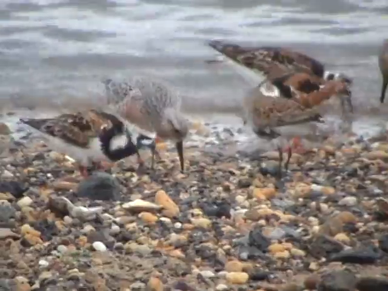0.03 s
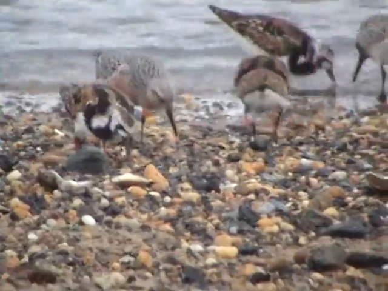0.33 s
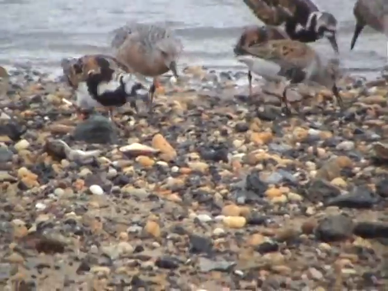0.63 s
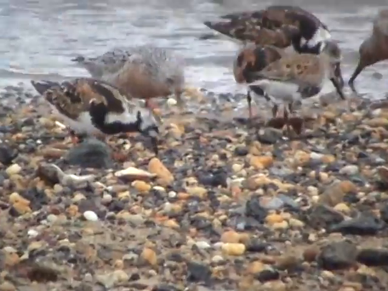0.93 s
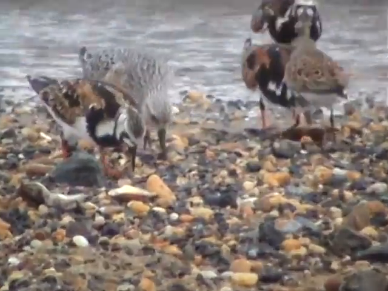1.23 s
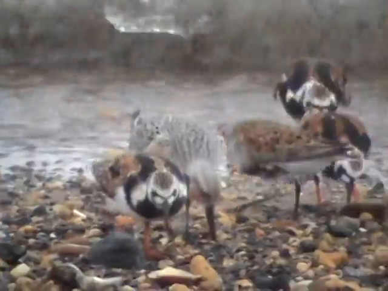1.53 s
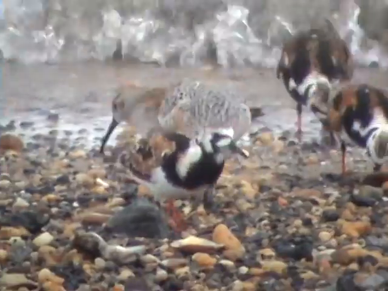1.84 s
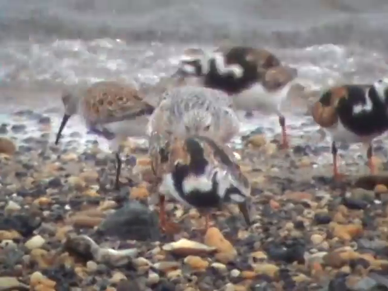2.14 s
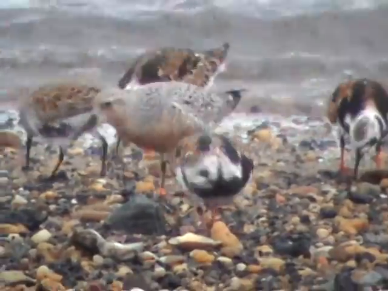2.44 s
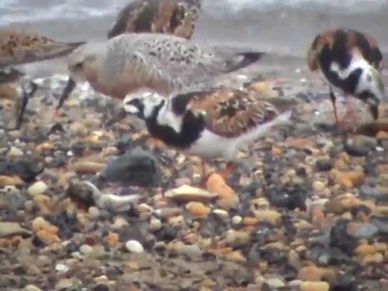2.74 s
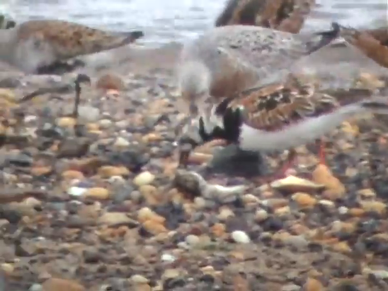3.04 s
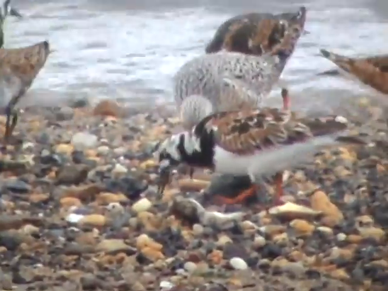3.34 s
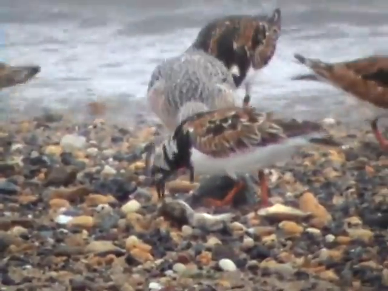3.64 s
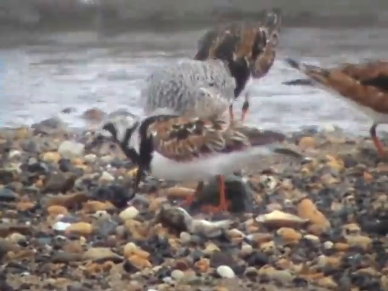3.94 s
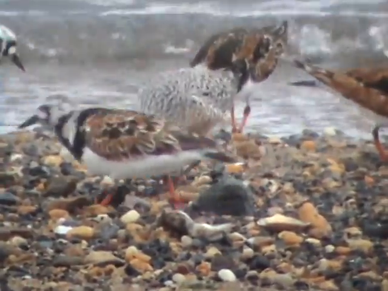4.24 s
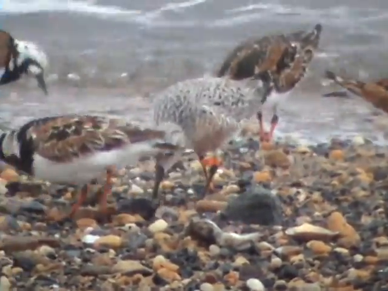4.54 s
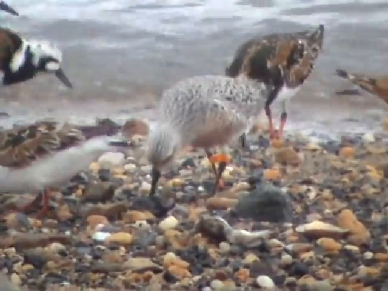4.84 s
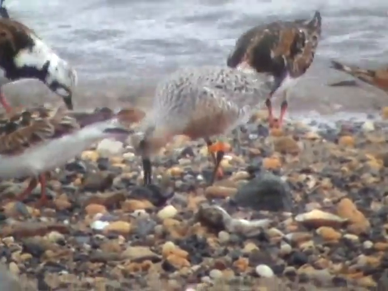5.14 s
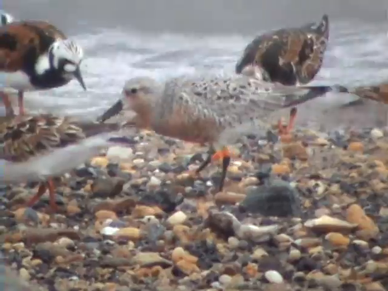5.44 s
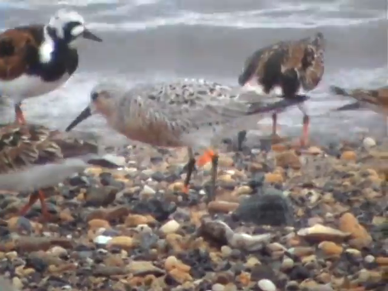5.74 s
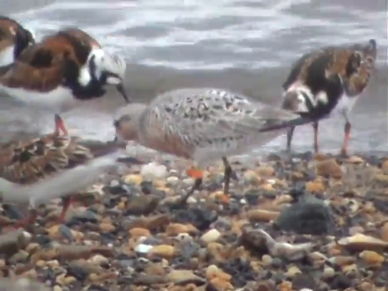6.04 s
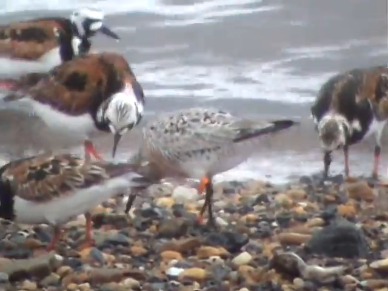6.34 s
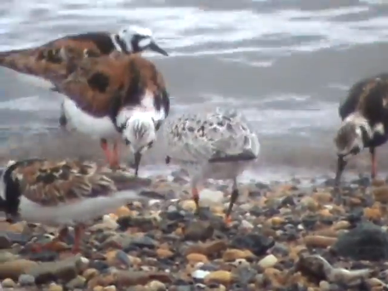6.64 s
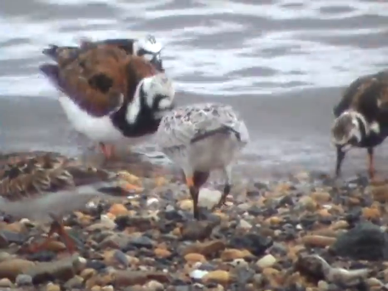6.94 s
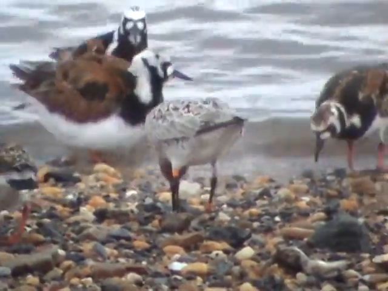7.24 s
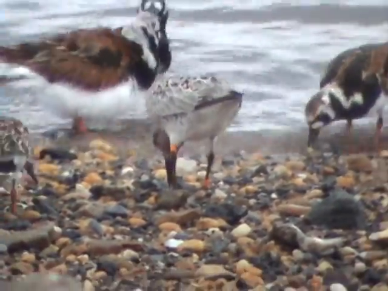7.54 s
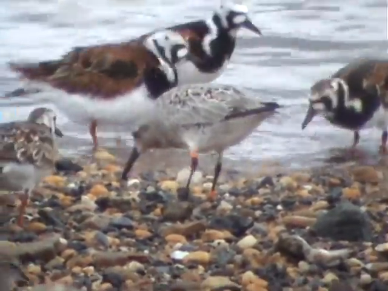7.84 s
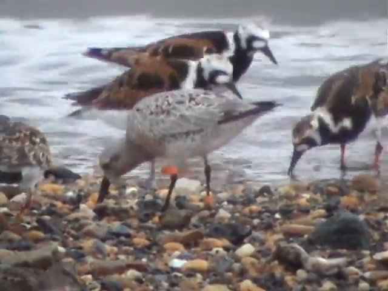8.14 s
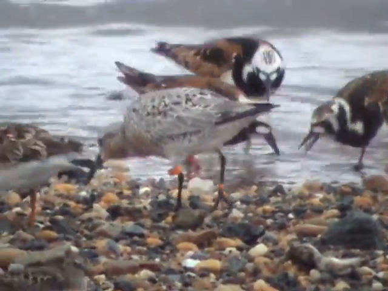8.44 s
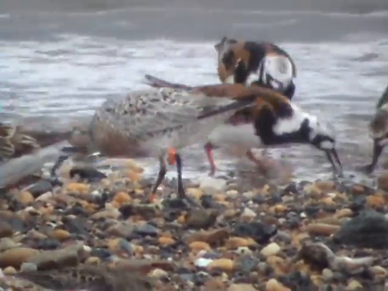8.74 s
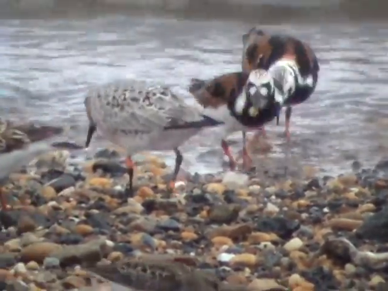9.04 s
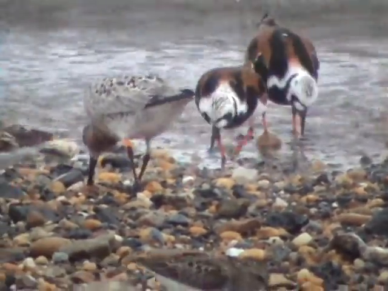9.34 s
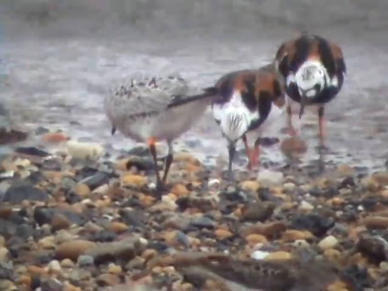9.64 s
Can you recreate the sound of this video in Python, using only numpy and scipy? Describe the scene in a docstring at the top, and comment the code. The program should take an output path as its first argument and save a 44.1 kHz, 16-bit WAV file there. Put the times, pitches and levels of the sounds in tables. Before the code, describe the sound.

A flock of shorebirds squabbles a few metres from the microphone on a pebble beach, with more birds chattering further off. Their rapid rattles and short whistles are broken by three louder falling cries in the first half. Small waves wash and bubble throughout, and one breaks early with a plop and fizz. Later the calls turn to short yaps. A few pebbles tick, and a very faint hum lies behind.

```python
"""Shorebirds on a pebble beach.

A flock squabbles a few metres away; more birds chatter further off. Notes are falling tones, chopped
into rattles that come in fading bursts or drawn out as whistles and cries; later come pips, arched
yaps and a squeak. Small waves wash in with ringing bubbles, and one breaks with a plop of trapped
air. Bills and feet tick on pebbles. Behind it all: a faint low hum, a distant engine-like drone and
a thin high whine."""
import sys
import numpy as np
from scipy import signal
from scipy.fft import rfft, irfft, next_fast_len
from scipy.io import wavfile
from scipy.ndimage import uniform_filter1d

SR = 44100
rng = np.random.default_rng(int(sys.argv[2]) if len(sys.argv) > 2 else 0)


def unload_wav(signal):
    """Save mono or channel-first audio to the path in sys.argv[1] as 16-bit WAV at rate SR, clipped to [-1, 1]."""
    wavfile.write(
        sys.argv[1],
        SR,
        np.round(np.clip(np.atleast_2d(signal).T, -1, 1) * 32767).astype(np.int16),
    )


N = 427769
TIME_S = np.arange(N) / SR

# waves (time [s], wash [relative dB], spray [relative dB])
WAVE_LEVELS = [(0.04, -57, -57), (0.33, -52, -57), (0.77, -55, -59), (1.98, -44.5, -55), (2.27, -55, -58),
               (3.19, -58, -62), (3.65, -53, -61), (4.37, -55.5, -62), (5.02, -50.5, -59), (6.09, -55, -60),
               (7.11, -54, -60), (7.4, -59, -62), (8.3, -59, -63), (9.7, -52.5, -58)]
# water noise (frequency [Hz], density [relative dB])
SURF_SPECTRUM = [(18, -50), (30, -9.5), (122, -7), (355, -10.5), (460, -16.5), (581, -8), (859, -10),
                 (1200, -5.5), (2190, -4.5), (2630, -5.5), (12500, -31), (15000, -48)]
# likeness of the surf at the two microphone ports (frequency [Hz], coherence [0-1])
PORT_COHERENCE = [(60, 1), (250, 0.6), (500, 0.07), (1000, 0.75), (2500, 1), (8000, 0.53), (12000, 0)]
# deep rumble (time [s], swell [relative])
RUMBLE_SWELL = [(5.1, -17), (5.45, 20), (5.85, 23), (6.2, 0)]
# low hum, distant engine-like drone (frequency [Hz], start level [dB], end level [dB])
HUM_AND_DRONE = [(113.6, -67, -76), (370, -75, -69)]
# throat and bill response (frequency [Hz], gain [dB])
THROAT_GAIN = [(700, 8.5), (1200, -1), (1800, 3), (3000, 4), (3800, 5.5), (4700, 3), (5400, -5),
               (7500, -10), (10000, -11), (12500, -6), (15000, -16)]
# distant flock (time [s], gain [dB])
FLOCK_GAIN = [(1.5, -1), (2.7, 2), (4.4, -2), (5.6, 4), (7.5, -2)]
# whistles (time [s], length [s], top pitch [Hz], level [dB], voice)
WHISTLE_NOTES = [(0.035, 0.04, 1520, -35, "full"), (0.088, 0.069, 1700, -36, "full"),
                 (0.7, 0.066, 1607, -34, "full"), (0.744, 0.027, 2106, -40.5, "pure"),
                 (2.419, 0.07, 1497, -38, "thin"), (2.725, 0.045, 1320, -43, "hoarse"),
                 (3.683, .035, 1380, -38, "thin"), (3.724, .03, 1350, -39, "thin"),
                 (3.775, .04, 1420, -38, "thin"), (4.826, 0.055, 1256, -36, "thin"),
                 (5.154, 0.037, 1352, -35, "thin"), (5.232, 0.052, 1587, -38.5, "reedy"),
                 (5.366, 0.025, 1317, -36, "thin"), (5.8, 0.022, 1163, -37, "thin"),
                 (5.886, 0.066, 1605, -43, "reedy"), (6.53, 0.057, 1292, -38, "thin"),
                 (6.717, 0.048, 1573, -40.5, "hoarse"), (6.828, 0.066, 1685, -41, "hoarse"),
                 (6.955, 0.048, 1730, -40, "hoarse"), (7.171, 0.045, 1433, -33, "thin"),
                 (7.689, 0.056, 570, -41, "pure"), (7.872, 0.072, 1350, -45, "pure"),
                 (7.965, .1, 1320, -47, "pure"), (8.293, 0.042, 620, -45, "pure"),
                 (8.792, 0.024, 1740, -41, "thin"), (9.129, .048, 1120, -41.5, "pure")]
# voice: (fundamental [dB], third harmonic [dB], flutter [0-1], pan [dB], crest [share of length],
# pitch fall per note length [1/s]); harmonics re the second, pan is left minus right
WHISTLE_VOICES = {"full": (4.5, -16, 0.55, -2, .27, 5), "reedy": (-3, -4, 0.3, -9, .4, 3),
                  "thin": (-10, -19, 0.9, 1, .15, 4), "hoarse": (-1, -11, 1, 2, .28, 4.8),
                  "pure": (-22, -22, 0.1, 1, .2, 1.3)}
# rattle bursts (time [s], notes, lead length [s], lead pitch [Hz], lead level [dB])
RATTLE_BURSTS = [(0.065, 1, 0.061, 1408, -38), (0.129, 1, 0.016, 1414, -37.5),
                 (0.161, 1, 0.028, 1530, -38.5), (0.214, 1, 0.036, 1600, -35.5),
                 (0.268, 1, 0.041, 1673, -39.5), (0.315, 1, 0.016, 1475, -36), (0.359, 3, 0.023, 1507, -38),
                 (0.747, 1, 0.024, 1444, -38.5), (0.964, 1, 0.025, 1443, -38), (1.237, 1, 0.035, 1934, -38),
                 (2.595, 1, 0.034, 1520, -40.5), (2.655, 1, 0.043, 1710, -38), (2.814, 1, 0.025, 1500, -44),
                 (2.846, 1, 0.019, 1525, -40), (2.873, 1, 0.021, 1640, -36.5), (2.898, 1, 0.029, 1680, -34),
                 (3.433, 1, 0.024, 1950, -36.5), (3.69, 2, 0.032, 1520, -38),
                 (3.792, 2, 0.039, 1610, -35.5), (3.907, 1, 0.021, 1350, -40),
                 (3.951, 1, 0.046, 1656, -35.5), (4.06, 2, 0.035, 1660, -35),
                 (4.178, 1, 0.025, 1545, -39.5), (4.224, 1, 0.034, 1720, -34),
                 (4.29, 1, 0.012, 1380, -41.5), (4.349, 3, 0.021, 1650, -34.5),
                 (4.514, 1, 0.045, 1727, -35), (4.674, 1, 0.052, 1610, -37.5), (4.942, 3, 0.035, 1482, -38),
                 (5.214, 1, 0.043, 1774, -37.5), (5.352, 2, 0.024, 1553, -36), (5.47, 1, 0.045, 1730, -37),
                 (5.556, 2, 0.023, 1535, -38), (5.632, 1, 0.036, 1530, -39.5),
                 (5.691, 1, .032, 1450, -37.5), (5.745, 2, 0.024, 1497, -38.5),
                 (6.013, 1, 0.022, 1740, -36), (6.064, 1, 0.029, 1633, -36.5),
                 (6.18, 2, 0.028, 1656, -36.5), (6.297, 2, 0.037, 1603, -36.5),
                 (7.006, 1, 0.021, 1373, -39.5), (7.139, 2, 0.035, 1504, -37.5),
                 (7.279, 1, 0.027, 1218, -39.5), (8.651, 1, 0.026, 1640, -42.5)]
# upper harmonics of the rattles (time [s], brightness [dB])
RATTLE_BRIGHTNESS = [(0, -5), (2.9, -4), (3.5, -10), (5.5, -6), (6.1, -4)]
# where the rattling and yapping birds stand (time [s], pan [dB])
BIRD_PAN = [(0, -1.5), (2.8, -6.5), (4, -2.5), (6.3, -4.5), (7.1, -0.5), (8.4, 4)]
# three cries, one curve each (time [s], pitch [Hz], level [relative dB])
CRY_CURVES = [
    [(0.505, 1570, -37), (0.517, 1790, -28), (0.529, 1823, -30), (0.549, 1663, -28.5), (0.565, 1425, -33),
     (0.587, 1106, -39), (0.6, 1000, -44)],
    [(2.3, 1910, -31), (2.312, 1883, -22), (2.32, 1887, -24), (2.352, 1844, -26.5), (2.38, 1653, -25),
     (2.402, 1490, -33.5), (2.425, 1125, -33.5)],
    [(3.452, 2060, -27.5), (3.472, 1748, -24), (3.502, 1566, -25), (3.51, 1510, -28), (3.518, 1446, -29),
     (3.548, 1176, -37.5), (3.56, 1130, -28.5)],
]
# knocked pebbles (time [s], ring [Hz], level [relative dB])
PEBBLE_TICKS = [(1.106, 8400, -37), (3.005, 6660, -33), (3.786, 9450, -33), (6.018, 9000, -40),
                (7.727, 7500, -33)]
# air pockets under the breaker (time [s], ring [Hz], t60 [s], level [dB])
AIR_PLOPS = [(1.633, 1200, .02, -26), (1.73, 1220, .023, -21), (1.7368, 4400, .0027, -20),
             (1.737, 1500, .015, -16.5), (1.7374, 1175, .026, -11.5), (1.738, 396, .062, -33)]
# collapse of the wave (start [s], end [s])
BREAKER_SPAN_S = (1.72, 2)
# pips, and one sharp pulse of a rattle at 4.667 s (time [s], length [s], top pitch [Hz], level [dB])
SHARP_PULSES = [(3.442, 0.017, 1500, -34), (4.667, 0.0062, 1720, -30), (5.58, 0.015, 1610, -31.5),
                (5.86, 0.019, 1610, -29.5), (6.163, 0.014, 1640, -29), (7.087, 0.02, 1610, -33)]
# yaps (time [s], length [s], top pitch [Hz], level [dB], tone)
YAP_NOTES = [(6.455, .042, 1188, -40.5, "harsh"), (7.781, 0.03, 1222, -43.5, "clear"),
             (7.832, 0.026, 1350, -42, "clear"), (7.922, .036, 1328, -38.5, "harsh"),
             (8.033, 0.042, 1354, -41.5, "clear"), (8.268, 0.036, 1404, -42, "clear"),
             (8.374, 0.029, 1310, -42, "harsh"), (8.489, 0.041, 1720, -43, "harsh"),
             (8.529, 0.048, 1570, -40.5, "harsh"), (8.696, 0.029, 1360, -40, "harsh"),
             (8.743, 0.033, 1390, -42, "harsh"), (8.813, .034, 1333, -42.5, "harsh"),
             (8.874, 0.039, 1343, -42, "harsh"), (8.939, 0.037, 1355, -41.5, "harsh"),
             (9.003, 0.053, 1616, -36.5, "harsh"), (9.097, 0.029, 1315, -41, "harsh"),
             (9.262, 0.068, 1380, -37.5, "clear"), (9.385, 0.026, 1480, -45, "clear"),
             (9.437, 0.029, 1285, -38, "clear"), (9.513, 0.028, 1237, -41, "harsh"),
             (9.646, 0.025, 1534, -44, "harsh")]
# tone: (roughness [0-1])
YAP_TONES = {"clear": .3, "harsh": .9}
# squeak (time [s], pitch [Hz])
SQUEAK_CURVE = [(7.345, 3300), (7.375, 5800), (7.387, 5000), (7.399, 5500), (7.414, 3300)]
# microphone ports (frequency [Hz], left lead [rad])
PORT_LEAD = [(60, -0.23), (350, 0.65), (2700, -0.98), (12000, -0.5)]


def undb(db):
    return 10 ** (np.asarray(db) / 20)


def unit(x):
    return x / np.sqrt(np.mean(x ** 2) + 1e-18)


def at_s(points, s):
    return np.interp(s, *np.transpose(points))


def at_hz(points, hz):
    """Interpolate on a log-frequency axis."""
    f, value = np.transpose(points)
    return np.interp(np.log(np.maximum(hz, 1)), np.log(f), value)


def butter(x, order, hz, kind):
    return signal.sosfilt(signal.butter(order, hz, kind, fs=SR, output="sos"), x)


def walk(rate_hz, size=N):
    """Smooth random wander, spread near 1."""
    k = max(int(SR / rate_hz), 1)
    held = np.repeat(rng.standard_normal(size // k + 2), k)
    return 1.39 * uniform_filter1d(uniform_filter1d(held, k), k)[:size]


def add(out, s, sound, pan_db=0):
    """Mix in at time s; pan is left minus right."""
    i = max(int(s * SR), 0)
    part = sound[:max(N - i, 0)]
    out[:, i:i + len(part)] += undb(np.array([[pan_db], [-pan_db]]) / 2) * part


def ring(hz, t60_s, glide=0):
    """Damped resonance; glide raises the pitch as it fades."""
    t = np.arange(int(t60_s * SR) + 2) / SR
    return np.sin(2 * np.pi * hz * t * (1 + glide * t / t60_s / 2)) * np.exp(-np.log(1000) * t / t60_s)


def progress(length_s):
    """0 to 1 through a note."""
    return np.linspace(0, 1, int(max(length_s, .004) * SR))


def wave_swell_db():
    """Wash and spray over their median levels."""
    s, *columns = np.transpose(WAVE_LEVELS)
    return [np.interp(TIME_S, s, db - np.median(db)) for db in columns]


def surf(level_db=-44, flicker_db=4.5, splash_db=4.5):
    """Water noise in half octaves: near-steady rumble, spluttering wash, smoothly swelling spray."""
    wash_db, spray_db = wave_swell_db()
    size = next_fast_len(N)
    hz = np.maximum(np.arange(size // 2 + 1) * SR / size, 1)
    mid, side = rfft(rng.standard_normal((2, size)))
    coherence = np.clip(at_hz(PORT_COHERENCE, hz), 0, 1)
    spectrum = np.sqrt(1 + coherence) * mid + np.sqrt(1 - coherence) * side * np.array([[1], [-1]])
    spectrum *= undb(at_hz(SURF_SPECTRUM, hz))
    spectrum *= undb(level_db) / irfft(spectrum).std()
    out, splash = 0, walk(45)
    for octave in np.arange(4, 14.5, .5):
        band = irfft(spectrum * np.maximum(1 - 2 * abs(np.log2(hz) - octave), 0), size)[:, :N]
        wash_share = at_hz([(130, .099), (300, .075), (900, .8), (4000, .1)], 2 ** octave)
        spray_share = at_hz([(1000, 0), (5000, .9), (15000, .4)], 2 ** octave)
        splutter_db = flicker_db * walk(25) + splash_db * splash
        rumble_db = at_hz([(130, .059), (220, 0)], 2 ** octave) * at_s(RUMBLE_SWELL, TIME_S)
        out += band * undb(rumble_db + wash_share * (wash_db + splutter_db) + spray_share * spray_db)
    return out


def bubbles(count=2200, base_db=-48.5, low_hz=550, high_hz=3400):
    """Bubbles ring in the backwash, louder as a wave runs up the stones."""
    out, wash_db = np.zeros((2, N)), wave_swell_db()[0]
    for when, pitch, faintness, side in rng.random((count, 4)):
        hz = low_hz * (high_hz / low_hz) ** pitch
        db = base_db + wash_db[int(when * N)] - 4 * np.log(faintness + .062)
        add(out, when * N / SR, undb(db) * ring(hz, 14 / hz, glide=.89), pan_db=6 * side - 3)
    return out


def hum_drone_whine(whine_hz=15725, whine_db=-74.5):
    """A faint low hum fades, a distant engine-like drone grows, a thin high whine holds; all waver."""
    low_tones = 0
    for hz, start_db, end_db in HUM_AND_DRONE:
        gain = undb(np.linspace(start_db, end_db, N) + 2.5 * walk(5))
        low_tones += gain * np.sin(2 * np.pi * np.cumsum(hz * (1 + .028 * walk(25))) / SR)
    gain = undb(whine_db + 1.5 * walk(12))
    whine = gain * np.sin(2 * np.pi * np.cumsum(whine_hz + 12 * walk(30)) / SR)
    return np.sqrt(2) * (low_tones + whine)


def syrinx(hz, first_db, third_db, upper_db, jitter, rasp, rolloff_db=0):
    """Eight harmonics, dB re the second, coloured by the throat. Jitter shakes pitch, rasp level."""
    hz = hz * (1 + jitter * walk(900, len(hz)))
    phase = 2 * np.pi * np.cumsum(hz) / SR
    levels_db = [first_db, 0, third_db, *(upper_db - rolloff_db * np.arange(5))]
    tone = 0
    for k, db in enumerate(levels_db, 1):
        gain = undb(db + at_hz(THROAT_GAIN, k * hz)) * (1 + rasp * walk(420, len(hz)))
        tone -= gain * np.cos(k * phase)
    return tone


def far_birds(count=330, base_db=-53.5, cutoff_hz=4500):
    """Random yaps and rattles along the shore, dulled by distance."""
    out = np.zeros((2, N))
    for when, kind, size, pitch, shape, loud, side in rng.random((count, 7)):
        s, hz, length_s = when * N / SR, 1100 + 650 * pitch, .02 + .035 * size
        note = yap(length_s, hz, shape / 2, third_db=-10) if kind < .5 else rattle(length_s, hz, shape)
        db = base_db + 4 * loud ** 2 + at_s(FLOCK_GAIN, s)
        add(out, s, undb(db) * note, pan_db=10 * side - 6)
    return beach_scatter(butter(out, 3, cutoff_hz, "lowpass"), wet_db=-8)


def whistle(length_s, top_hz, crest, fall, first_db, third_db, flutter, flutter_hz=150):
    """Open valve: the pitch scoops up, arches and sinks with the level as pressure runs out."""
    u = progress(length_s)
    scoop = 1 - .08 * (1 - u) ** 8
    hz = top_hz * (1 - fall * ((u - crest) / (1 - crest)) ** 2) * scoop
    pressure = np.interp(u, [0, .084, .32, .88, 1], [0, 1, .85, .8, 0])
    # low pressure at both ends: the valve flutters shut
    chop = np.clip(flutter * 1.3 * abs(2 * u - 1), 0, 1)
    gate = 1 - chop * np.cos(np.pi * flutter_hz * u * length_s) ** 2
    tone = syrinx(hz, first_db, third_db, upper_db=-26, jitter=.007 + .035 * chop ** 2, rasp=.25)
    return unit(tone * pressure * gate)


def rattle(length_s, pitch_hz, merge, bright_db=-9, pulse_hz=154, uneven_db=1.6):
    """A valve chops a sinking tone into uneven, arched pulses; merge widens and fuses them."""
    u = progress(length_s)
    beats = u * length_s * pulse_hz
    cycle = (beats + .06 * u * walk(120, len(u))) % 1
    # pressure still building: the first pulse is shorter and weaker
    onset_width = np.minimum(.72 + .28 * beats, 1)
    onset_gain = np.interp(beats, [.4, 1], [.7, 1])
    duty = np.clip((.44 + .62 * merge * u) * onset_width, .1, 1)
    gate = np.sin(np.pi * np.minimum(cycle / duty, 1) ** .75)
    fused = np.clip(1.6 * merge * u - .55, 0, 1)
    arch = .15 * (gate - .8) * (1 - fused)
    hz = pitch_hz * (1 - (.08 + .3 * merge) * u ** 1.5) * (1 + arch)
    pressure = np.interp(u, [0, .3, .6, .93, 1], [1, 1, .8, .5, 0]) * onset_gain
    tone = syrinx(hz, first_db=-6 - .65 * bright_db, third_db=bright_db - 2, upper_db=bright_db - 9,
                  jitter=.022, rasp=.26, rolloff_db=2)
    uneven = undb(uneven_db * walk(pulse_hz, len(u)))
    return unit(tone * ((1 - fused) * gate + .7 * fused) * pressure * uneven)


def rattle_bursts(step_s=.0565, fade_db=1, drop=.0575, shrink=.208, fuse_from_s=.0055, fuse_over_s=.0267):
    """Each note of a burst is weaker, lower and shorter; long notes fuse into a tone."""
    out = np.zeros((2, N))
    for s, notes, lead_s, lead_hz, lead_db in RATTLE_BURSTS:
        for k in range(round(notes)):
            length_s = lead_s * (1 - shrink) ** k
            merge = np.clip((length_s - fuse_from_s) / fuse_over_s, 0, 1)
            note = rattle(length_s, lead_hz * (1 - drop) ** k, merge, at_s(RATTLE_BRIGHTNESS, s))
            add(out, s + k * step_s, undb(lead_db - k * fade_db) * note, at_s(BIRD_PAN, s))
    return out


def cry(curve, gain_db=-1, creak_s=.014, creak_hz=150, edge_s=.0011):
    """Downslur at full pressure: creaks, then rings clear. Louder cries are brighter."""
    s, hz, db = np.transpose(curve)
    t = np.arange(s[0], s[-1], 1 / SR)
    creak = np.exp(-((t - s[0]) / creak_s) ** 2)
    tone = syrinx(np.interp(t, s, hz), first_db=-3.5, third_db=-21.5, upper_db=db.max() + 2,
                  jitter=.0057 + .038 * creak, rasp=.12, rolloff_db=1.5)
    gate = 1 - creak * np.cos(np.pi * creak_hz * (t - s[0])) ** 2
    edges = np.clip(np.minimum(t - s[0], s[-1] - t) / edge_s, 0, 1)
    return unit(tone * gate) * edges * undb(np.interp(t, s, db) + gain_db)


def pebbles(t60_s=.0064):
    """Bills and feet knock pebbles: four very short modes."""
    out = np.zeros((2, N))
    for s, hz, db in PEBBLE_TICKS:
        modes = sum(ring(hz * ratio, t60_s) / ratio for ratio in (.62, 1, 1.2, 1.55))
        add(out, s, undb(db) * modes / 2)
    return out


def foam(level_db=-50.5, band_hz=(4000, 9500), lag_s=.1, width_s=.37):
    """Spray fizzes as the crest curls, then dies away."""
    fizz = butter(rng.standard_normal((2, N)), 2, band_hz, "bandpass")
    swell = np.exp(-((TIME_S - BREAKER_SPAN_S[0] - lag_s) / width_s) ** 2)
    return unit(fizz) * swell * undb(level_db + 2 * walk(250))


def plops():
    """Trapped air rings under the breaker."""
    out = np.zeros((2, N))
    for s, hz, t60_s, db in AIR_PLOPS:
        add(out, s, undb(db) * ring(hz, t60_s))
    return out


def gurgle(count=60, base_db=-43, low_hz=220, high_hz=900):
    """Large bubbles churn where the wave folds over."""
    out = np.zeros((2, N))
    for when, pitch, faintness, side in rng.random((count, 4)):
        hz = low_hz * (high_hz / low_hz) ** pitch
        bubble = undb(base_db + 7 * pitch - 14 * faintness) * ring(hz, 12 / hz, glide=.3)
        add(out, np.interp(when, [0, 1], BREAKER_SPAN_S), bubble, pan_db=8 * side - 4)
    return out


def sharp_pulse(length_s, top_hz):
    """A brief, raspy arch of pitch: a pip, or one pulse of a rattle."""
    u = progress(length_s)
    hz = top_hz * (1 - (u - .4) ** 2)
    tone = syrinx(hz, first_db=-14, third_db=-23, upper_db=-34, jitter=.071, rasp=.44)
    return unit(tone * np.sin(np.pi * u))


def yap(length_s, top_hz, rough, third_db=-8, flutter_hz=150):
    """One steep pitch arch with a random lean; rough yaps flutter and waver."""
    u = progress(length_s)
    from_crest = 2 * u ** rng.uniform(.55, 1.2) - 1
    hz = top_hz * (1 - .3 * from_crest ** 2)
    tone = syrinx(hz, first_db=1, third_db=third_db, upper_db=third_db - 6,
                  jitter=.065 * rough, rasp=.8 * rough, rolloff_db=6)
    flutter = 1 - .6 * rough * np.cos(np.pi * flutter_hz * u * length_s) ** 2
    return unit(tone * flutter * np.sin(np.pi * u))


def squeak(level_db=-48.5):
    """A scratchy glide leaps, wobbles and drops, doubled an octave below."""
    t = np.arange(SQUEAK_CURVE[0][0], SQUEAK_CURVE[-1][0], 1 / SR)
    hz = at_s(SQUEAK_CURVE, t) * (1 + .04 * walk(900, len(t)))
    phase = 2 * np.pi * np.cumsum(hz) / SR
    tone = np.sin(phase) + np.sin(phase / 2)
    return undb(level_db) * unit(tone * np.sqrt(np.hanning(len(t))))


def near_birds():
    """All close calls, timed and panned."""
    out = rattle_bursts()
    for s, length_s, hz, db, voice in WHISTLE_NOTES:
        first_db, third_db, flutter, pan_db, crest, fall_per_s = WHISTLE_VOICES[voice]
        note = whistle(length_s, hz, crest, fall_per_s * length_s, first_db, third_db, flutter)
        add(out, s, undb(db) * note, pan_db)
    for s, length_s, hz, db, tone in YAP_NOTES:
        add(out, s, undb(db) * yap(length_s, hz, YAP_TONES[tone]), at_s(BIRD_PAN, s))
    add(out, SQUEAK_CURVE[0][0], squeak())
    for curve in CRY_CURVES:
        add(out, curve[0][0], cry(curve), pan_db=-3.5)
    for s, length_s, hz, db in SHARP_PULSES:
        add(out, s, undb(db) * sharp_pulse(length_s, hz), pan_db=7)
    return out


def beach_scatter(x, wet_db=-12, t60_s=.015):
    """Pebbles throw back a short diffuse tail."""
    t = np.arange(SR // 4) / SR
    tail = rng.standard_normal((2, len(t))) * np.exp(-np.log(1000) * t / t60_s) * (t > .002)
    tail = tail + 1.4 * tail[::-1]  # channel crossfeed
    tail /= np.sqrt(np.sum(tail ** 2, axis=1, keepdims=True))
    return x + undb(wet_db) * signal.fftconvolve(x.mean(0)[None], tail, axes=1)[:, :N]


def scene():
    """Birds and small knocks over water and faint tones."""
    water = surf() + bubbles() + gurgle() + foam()
    knocks = butter(pebbles() + plops(), 2, 330, "highpass")  # small bodies radiate little bass
    return beach_scatter(near_birds() + knocks) + far_birds() + water + hum_drone_whine()


def record(dry):
    """Two ports differ in phase; deep bass and top are cut."""
    low_hz, top_hz = 38, 15900
    size = next_fast_len(N)
    spectrum = rfft(butter(dry, 2, low_hz, "highpass"), size)
    lead_rad = at_hz(PORT_LEAD, np.arange(size // 2 + 1) * SR / size)
    ports = irfft(spectrum * np.exp(1j * lead_rad * np.array([[1], [-1]]) / 2), size)[:, :N]
    return signal.sosfilt(signal.ellip(10, .2, 70, top_hz, fs=SR, output="sos"), ports)


dry = scene()
out = record(dry)
unload_wav(out)
```